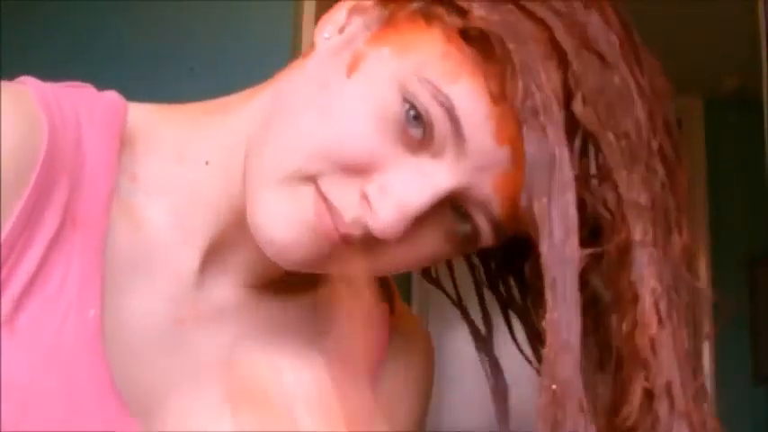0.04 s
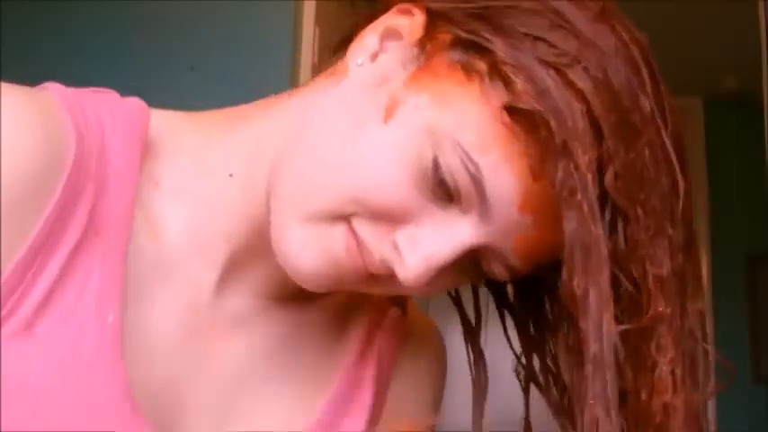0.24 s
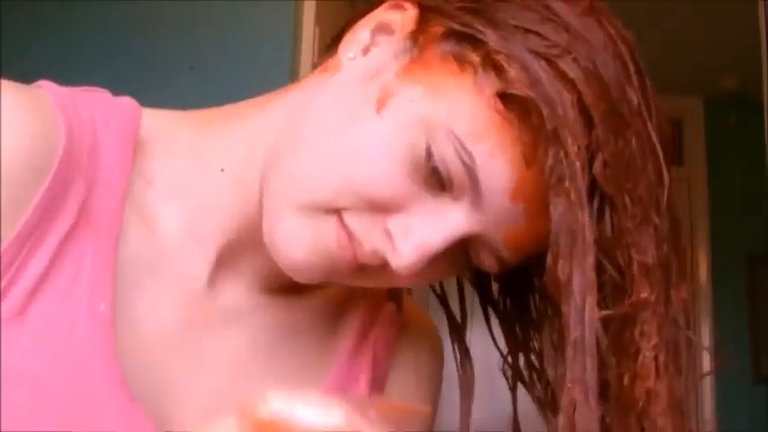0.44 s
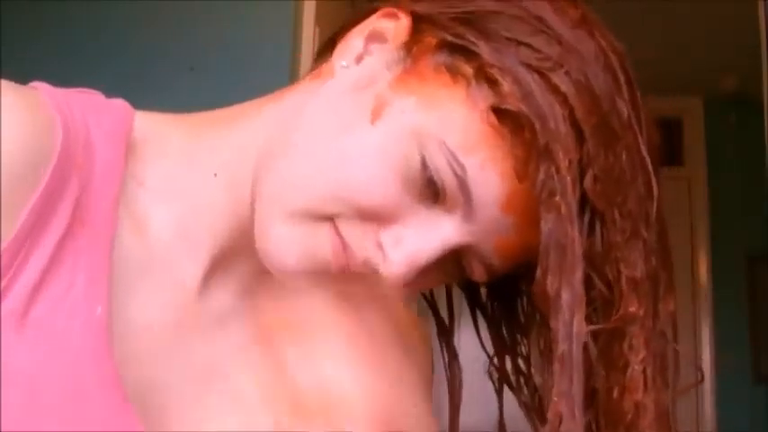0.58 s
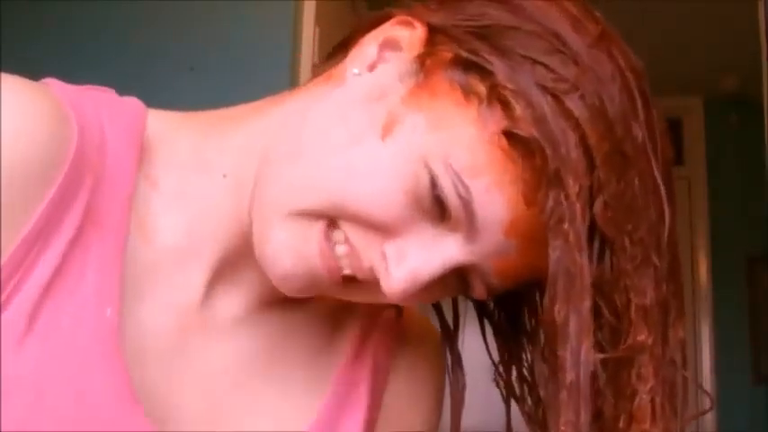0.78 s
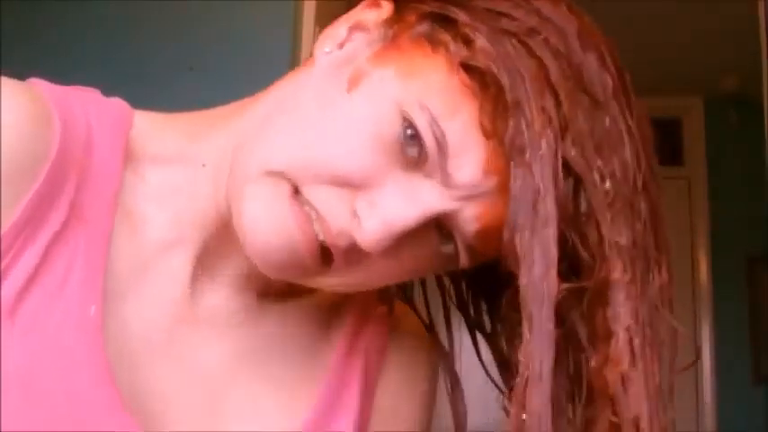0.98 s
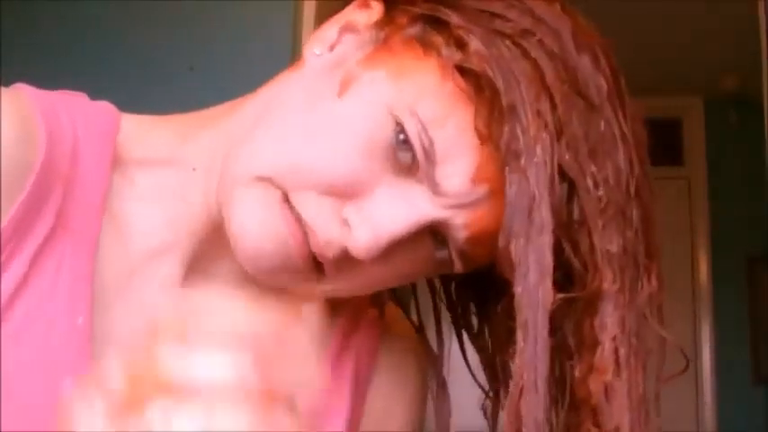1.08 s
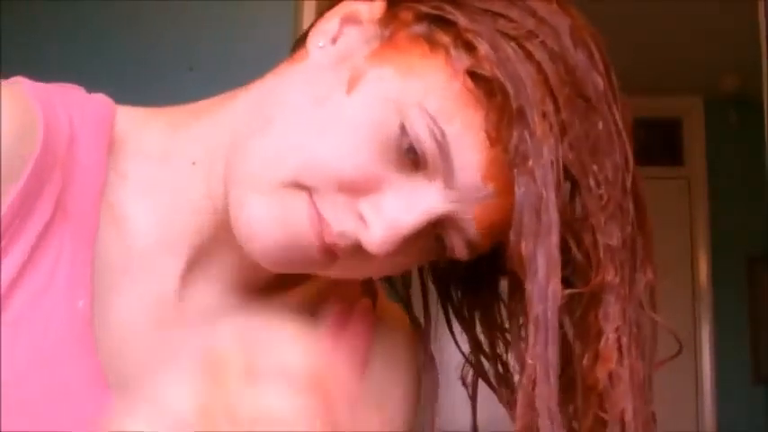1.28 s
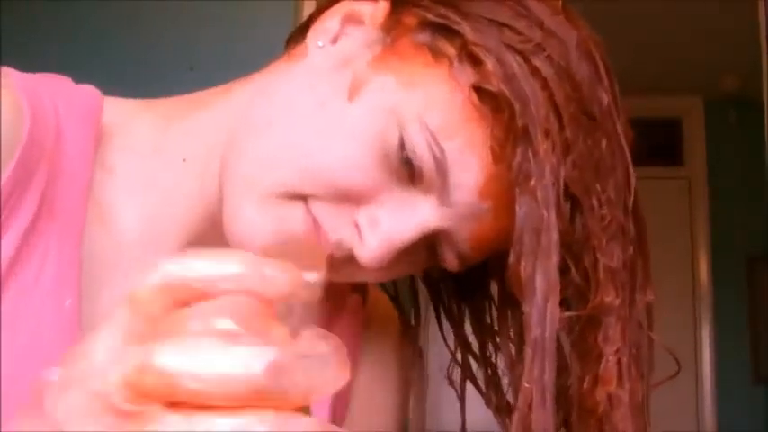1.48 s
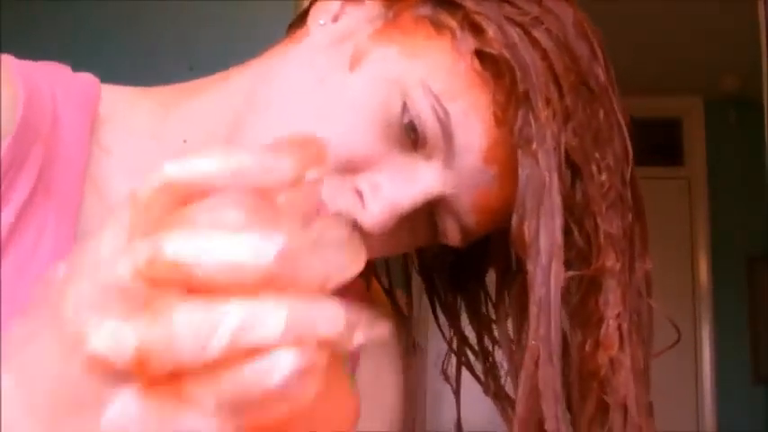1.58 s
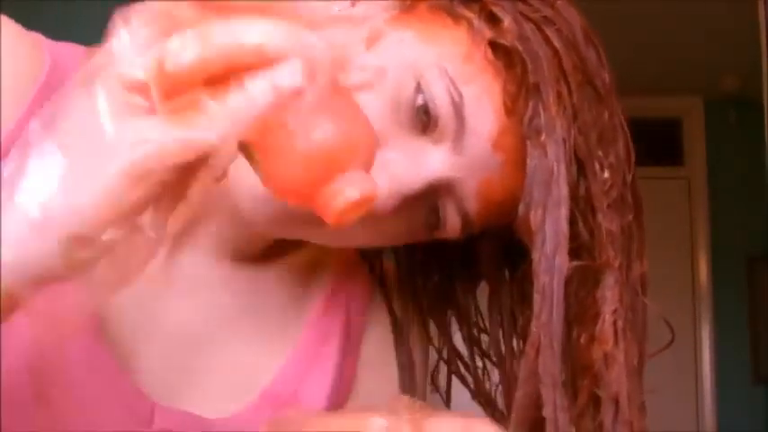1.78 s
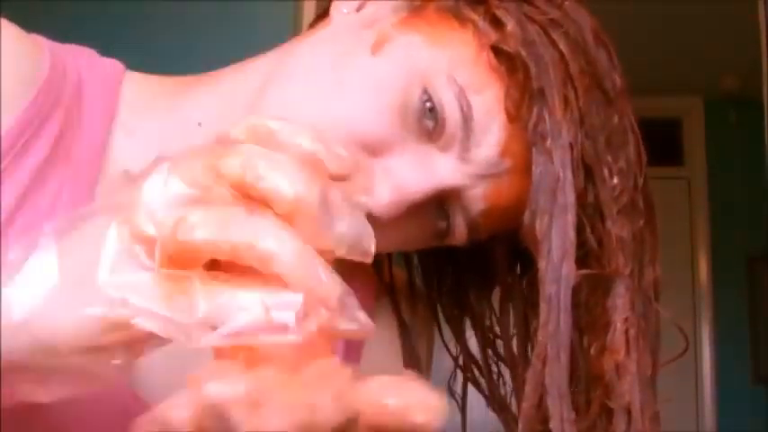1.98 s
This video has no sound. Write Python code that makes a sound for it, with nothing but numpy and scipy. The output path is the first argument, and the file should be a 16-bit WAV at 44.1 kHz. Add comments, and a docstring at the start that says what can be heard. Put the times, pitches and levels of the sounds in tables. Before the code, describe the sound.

Fast, bright, rattling knocks of a shaken plastic bottle run almost nonstop, then stop briefly and return as slower single shakes; a plastic glove crinkles softly over quiet steady hiss, recorded close indoors.

```python
"""Shaken plastic bottle

A gloved hand shakes a small bottle close to a camera: knocks crack and ring it, each has a noisy tail. The
knocks are rough noise bursts driving fading sine waves; the tails are fading grainy noise. The glove rustles in
random tiny clicks and ticks in short noise bursts, one of which is the bottle bouncing again just after a
knock; a fan is steady coloured noise."""
import sys
import numpy as np
from scipy import signal
from scipy.fft import rfft, irfft
from scipy.io import wavfile

SR = 44100
rng = np.random.default_rng(int(sys.argv[2]) if len(sys.argv) > 2 else 0)


def wav_out(sig):
    """Save sig, one row per channel (or a flat mono array), as 16-bit PCM at SR to the path in sys.argv[1]."""
    wavfile.write(sys.argv[1], SR, np.round(np.clip(np.atleast_2d(sig).T, -1, 1) * 32767).astype(np.int16))


def how_loud(loudness_db):
    """Turn decibels into a plain amplitude multiplier (0 dB gives 1, 20 dB gives 10)."""
    steps = np.asarray(loudness_db, float) / 20
    return 10 ** steps


N = 90228  # samples in the scene

# Deeper ringing tones of the bottle; t60 is the time to fade by 60 dB: (f/Hz, level/dB, t60/s)
BODY_MODES = [(468, -13, .07), (585, -12, .07), (688, -6, .09), (790, 1.5, .08), (980, -3, .06),
              (1125, -3, .09), (1250, -4, .05), (1440, -11, .04), (1633, -1.5, .07), (1730, 0, .07),
              (1800, -5, .05), (1900, -4, .045), (2180, -4, .04)]
# Tone colour shared by the crack and the noisy tail: (f/Hz, level/dB)
BLOW_COLOUR = [(60, -53), (250, -31), (450, -5), (750, 5.5), (1700, -1.5), (2500, -3.5), (3300, -8.5),
               (4600, -11), (6000, -6), (8300, -3), (11000, -7.5), (14200, -1.5), (16000, -3)]
KNOCK_T = np.arange(6000) / SR  # time within one knock, s
SPLIT_HZ = 3470  # between the low and high parts of the noisy tail


def level(x, db):
    """Scale a sound to a chosen average (rms) level in dB."""
    return x * how_loud(db) / np.sqrt(np.mean(x ** 2))


def colour(x, table):
    """Filter that shapes the tone through (f/Hz, level/dB) points and never sounds ahead of its input."""
    hz, db = np.array(table, float).T
    size = 2048
    bins_hz = np.arange(size // 2 + 1) * SR / size
    log_gain = np.interp(np.log(bins_hz + 1), np.log(hz), db) * np.log(10) / 20
    # Folding the cepstrum onto positive times gives a minimum-phase filter
    cepstrum = irfft(log_gain)
    cepstrum[1:size // 2] *= 2
    cepstrum[size // 2 + 1:] = 0
    response = irfft(np.exp(rfft(cepstrum)))[:size // 2]
    return signal.fftconvolve(x, response)[:len(x)]


def band(x, hz, kind):
    """Keep the part below ("low") or above ("high") a frequency, with a Butterworth filter."""
    return signal.sosfilt(signal.butter(2, hz, kind, fs=SR, output="sos"), x)


def fade(t60):
    """Smooth dying away by 60 dB in t60 seconds."""
    return np.exp(-np.log(1000) * KNOCK_T / t60)


def glove():
    """Dense tiny creases under the grip make random clicks; a few lone ticks are quick noise bursts, one of
    them (at 1.432 s) the bottle bouncing a second time just after a knock."""
    # Rise and fall of the rubbing: (t/s, level/dB)
    rub = [(0, -70), (.3, -71.5), (.42, -66.5), (.7, -72), (.98, -67.5), (1.04, -58.5), (1.11, -50),
           (1.2, -52), (1.27, -66.5), (1.5, -77), (1.63, -71), (1.67, -64), (1.72, -71.5), (2.05, -70)]
    # Tone colour of the glove: (f/Hz, level/dB)
    rub_colour = [(400, -36), (1500, -14), (2400, -8), (3300, -15), (4800, -19), (5500, 0), (7000, -5),
                  (8600, -3), (10200, -11), (16000, -15)]
    # Lone ticks, the one at 1.432 s being a second bounce of the bottle, levels ahead of the colouring: (t/s,
    # level/dB)
    tick_list = [(1.108, -23), (1.118, -36), (1.432, -28), (1.518, -52), (1.539, -50), (1.589, -52),
                 (1.628, -50), (1.649, -61), (1.661, -50)]
    creases_per_s, spread_db, tick_fall_s = 9000, 1.5, 0.002
    t = np.arange(N) / SR

    happens = rng.random(N) < creases_per_s / SR
    strength = how_loud(spread_db * rng.exponential(size=N))
    creases = happens * strength * rng.standard_normal(N)
    rustle = level(colour(creases, rub_colour), 0) * how_loud(np.interp(t, *np.array(rub).T))

    ticks = np.zeros(N)
    for s, db in tick_list:
        ticks += how_loud(db) * (t >= s) * np.exp(-np.maximum(t - s, 0) / tick_fall_s)
    return rustle + colour(ticks * rng.standard_normal(N), rub_colour)


def fan():
    """Steady hiss of coloured noise, with a few narrow resonances added."""
    # Tone colour of the hiss: (f/Hz, level/dB)
    hiss_colour = [(20, -26), (60, -25), (200, -25.5), (500, -28.5), (900, -16.5), (1600, -9.5),
                   (2800, -9.5), (4500, -21.5), (8000, -27.5), (11000, -21), (14500, -14.5), (16000, -50.5)]
    # Added resonances: (f/Hz, width/Hz, level/dB)
    resonances = [(1186, 115, 8.5), (1910, 45, 8.5), (2117, 46, 12.5), (2390, 70, -8.5)]
    hiss = colour(rng.standard_normal(N), hiss_colour)
    total = hiss.copy()
    for hz, width, db in resonances:
        total += how_loud(db) * signal.lfilter(*signal.iirpeak(hz, hz / width, fs=SR), hiss)
    return level(total, -64.5)


def rough_noise(roughness_db, count):
    """Noise with a soft start whose strength jumps at random every count samples."""
    jumps = rng.standard_normal(len(KNOCK_T) // count)
    roughness = how_loud(roughness_db * np.repeat(jumps, count))
    rise = 1 - np.exp(-(KNOCK_T / 0.0013) ** 2)  # rise time in s
    return rng.standard_normal(len(KNOCK_T)) * roughness * rise


def ring(force, modes, db):
    """A force sets off fading sine waves, each a little off in pitch and strength."""
    scatter_db, pitch_jitter = 1.8, 0.005  # jitter as a share of the pitch
    hz, mode_db, t60 = np.array(modes).T[:, :, None]
    strength, detune = rng.standard_normal((2, len(modes), 1))
    waves = np.sin(2 * np.pi * hz * (1 + pitch_jitter * detune) * KNOCK_T)
    tones = np.sum(how_loud(mode_db + scatter_db * strength) * fade(t60) * waves, axis=0)
    return level(signal.fftconvolve(force, tones)[:len(KNOCK_T)], db)


def contact():
    """A short rattling push cracks and rings the bottle: returns crack, low ring and high ring."""
    # Brighter ringing tones of the bottle: (f/Hz, level/dB, t60/s)
    shell = [(5500, -6, .02), (6150, -5, .02), (7380, -4, .02), (8260, 0, .025), (8850, -2, .025),
             (11300, -4, .02), (12800, -4, .02), (14270, 0, .03), (15100, -3, .02)]
    push = rough_noise(4, count=20) * np.exp(-KNOCK_T / 0.00067)  # fall time in s
    crack = level(band(colour(push, BLOW_COLOUR), 2200, "high"), -39)
    return crack, ring(push, BODY_MODES, -16), ring(push, shell, -28.5)


def noisy_tail():
    """Grainy noise, strongest at its start, dies away and still rings the bottle: returns low and high."""
    first_db, first_fall_s = 6, 0.0022
    grains = rough_noise(2.5, count=60)
    grains = grains * (1 + how_loud(first_db) * np.exp(-KNOCK_T / first_fall_s))
    noise = colour(grains, BLOW_COLOUR)
    low = level(band(noise, SPLIT_HZ, "low") * fade(0.12), -18.5)
    high = level(band(noise, SPLIT_HZ, "high") * fade(0.081), -13)
    return low + ring(grains * fade(0.073), BODY_MODES, -24.5), high


def knock(crack_db, body_db, smack_db, bright_db):
    """One contact and its noisy tail, mixed as crack, low body, upper body (smack) and bright part."""
    smack_hz = 1450  # between low and upper body
    crack, ring_low, ring_high = contact()
    tail_low, tail_high = noisy_tail()
    low = ring_low + tail_low
    # Each filter runs twice for a steeper split
    body = band(band(low, smack_hz, "low"), smack_hz, "low")
    smack = band(band(low, smack_hz, "high"), smack_hz, "high")
    bright = ring_high + tail_high
    return how_loud(crack_db) * crack + how_loud(body_db) * body + how_loud(smack_db) * smack + how_loud(bright_db) * bright


def bottle():
    """All knocks in place; so small a body sends out little bass."""
    # Knocks, gains on the parts: (t/s, crack/dB, low body/dB, upper body/dB, brightness/dB)
    knocks = [(0.046, -45, -49.5, -47, -38), (0.091, -24, -47, -44, -36), (0.137, -15, -48, -42, -34.5),
              (0.185, -20.5, -50, -40, -34.5), (0.231, -34, -53, -47.5, -35.5),
              (0.276, -24, -50.5, -47, -34), (0.319, -23, -54, -51.5, -34),
              (0.435, -19.5, -55.5, -38, -41.5), (0.478, -25.5, -55.5, -48.5, -40.5),
              (0.523, -30, -64, -48.5, -41.5), (0.571, -27.5, -56.5, -44, -39.5),
              (0.614, -51, -48.5, -40.5, -36), (0.657, -25, -48.5, -44.5, -38),
              (0.697, -28.5, -56.5, -49, -38), (0.735, -54, -52.5, -51, -37), (0.774, -24, -46, -41, -35),
              (0.809, -23, -49, -43.5, -35.5), (0.848, -47, -49, -44.5, -36.5),
              (0.886, -23, -45, -49.5, -36), (0.923, -48, -50, -59, -40), (0.964, -22.5, -48, -44, -37),
              (1.008, -64, -44, -51.5, -34), (1.048, -17, -51.5, -37, -31), (1.09, -32, -47.5, -49, -34),
              (1.127, -21, -46.5, -43, -32.5), (1.167, -25, -46.5, -42, -36), (1.21, -48, -48, -56, -34.5),
              (1.254, -18, -51.5, -44, -35), (1.296, -18.5, -50.5, -46, -33.5),
              (1.336, -21.5, -55, -39.5, -36), (1.378, -22, -47, -40.5, -36),
              (1.422, -14.5, -44, -38.5, -34.5), (1.464, -17, -53, -40, -34.5),
              (1.676, -23, -57, -41.5, -39.5), (1.748, -15.5, -49.5, -40.5, -36.5),
              (1.83, -17, -55.5, -45, -38), (1.91, -15, -58, -39, -38), (1.994, -13, -50, -40.5, -34.5)]
    first = (0.00034, -30, -43.5, -44, -35)  # knock at the start, same columns
    out = np.zeros(2 * N)
    for s, *gains_db in [first] + list(knocks):
        one = knock(*gains_db)
        at = int(s * SR)
        out[at:at + len(one)] += one
    return colour(out[:N], [(310, -13.5), (460, 0)])


def scene():
    """Glove, fan and bottle, a little to the left; a weaker unrelated share differs between microphones."""
    # How much differs between the microphones: (f/Hz, level/dB)
    side_share = [(120, -4), (250, -12), (500, -23), (1000, -20), (3000, -16.5), (8000, -13.5),
                  (16000, -13.5)]
    left_db = 1.3  # left over right
    mid = glove() + fan() + bottle()
    side = colour(glove() + fan() + bottle(), side_share)
    balance = how_loud(np.array([[left_db], [-left_db]]) / 2)
    return np.array([mid + side, mid - side]) * balance


def roll_off(x):
    """The treble ends steeply here."""
    return signal.sosfilt(signal.butter(12, 16970, fs=SR, output="sos"), x)


def record(dry):
    """The camera cuts the top of the sound with a steep low-pass filter."""
    top_cut = signal.ellip(6, .5, 45, 15570, fs=SR, output="sos")  # ripple dB, depth dB, edge Hz
    mix = signal.sosfilt(top_cut, dry)
    return roll_off(mix)


dry = scene()
out = record(dry)
wav_out(out)
```